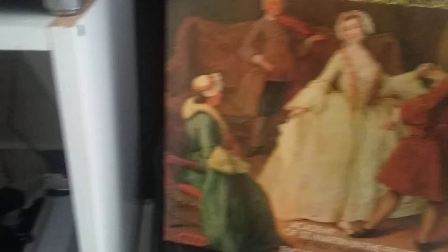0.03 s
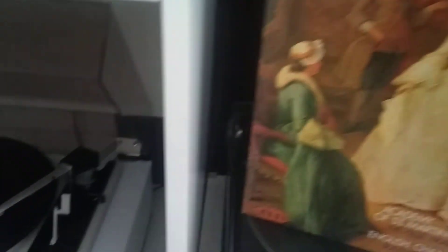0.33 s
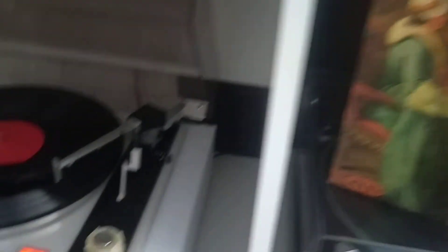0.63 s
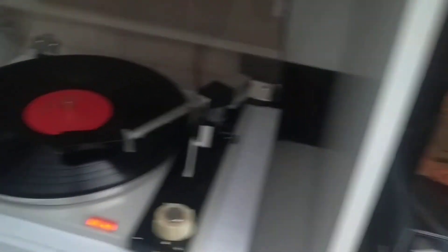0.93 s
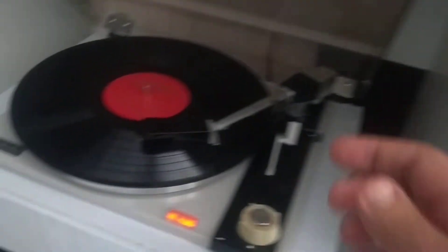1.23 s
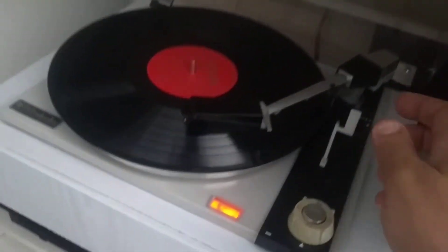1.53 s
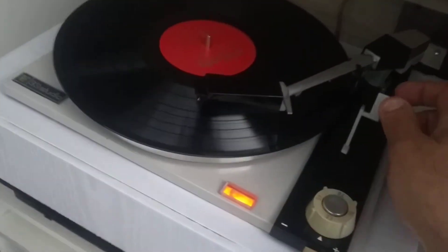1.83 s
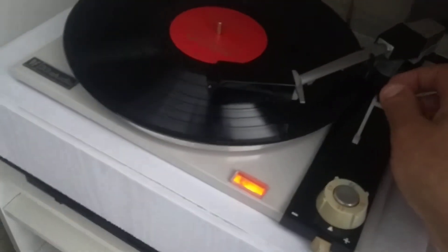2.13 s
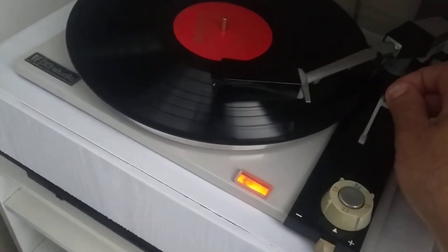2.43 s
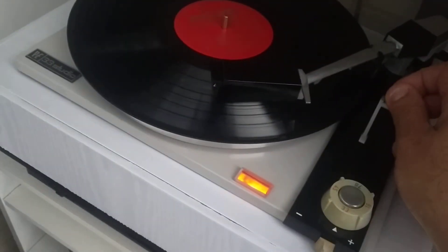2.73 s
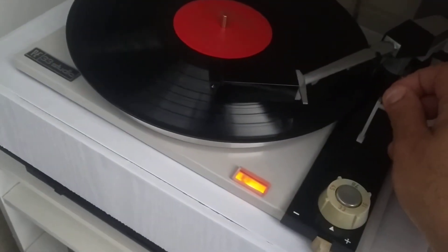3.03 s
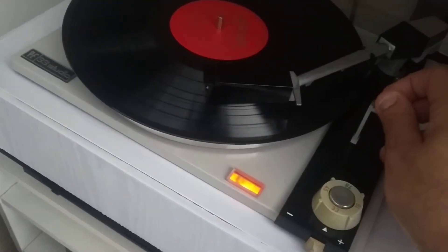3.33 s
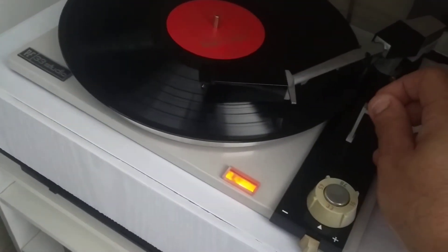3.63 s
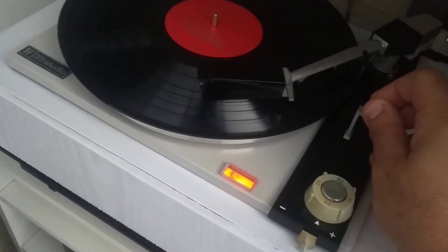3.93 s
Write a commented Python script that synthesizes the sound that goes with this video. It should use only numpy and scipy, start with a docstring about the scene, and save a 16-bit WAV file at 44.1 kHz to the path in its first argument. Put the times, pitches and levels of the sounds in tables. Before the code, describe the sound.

A record player is handled with small clicks, close to a hand-held microphone indoors. After a few finger bumps and a soft sleeve rustle, its lever knocks faintly twice over low room hiss, followed later by a bright pop.

```python
"""Low rumble, faint hum and microphone hiss fade up: a quiet room, heard from a hand-held camera.
The moving camera drones, and fingers tick and bump on its body. A sleeve swishes and rustles as
the hand reaches for a turntable. The cue lever knocks twice, thumping the plinth, among short scuffs.
At the end comes one sharp, bright pop that rings in the shelf."""
import sys
import numpy as np
from scipy.fft import rfft, irfft, next_fast_len
from scipy.io import wavfile
from scipy.ndimage import uniform_filter1d, map_coordinates

SR = 44100
rng = np.random.default_rng(int(sys.argv[2]) if len(sys.argv) > 2 else 0)


def persist_wave(psi):
    """Save psi, clipped to +-1, as 16-bit WAV."""
    counts = np.round(np.clip(psi, -1, 1) * 32767).astype(np.int16)
    wavfile.write(sys.argv[1], SR, np.atleast_2d(counts).T)


N = 176400
T = np.arange(N) / SR
AGE = np.arange(SR // 5) / SR  # time within one event, s
START_S = 0.1  # camera switches on


def amp(db):
    """Decibels to gain."""
    return 10 ** (np.asarray(db) / 20)


def unit(x):
    """Scale to rms 1."""
    return x / np.sqrt(np.mean(x ** 2) + 1e-20)


def along(points, hz):
    """Interpolate (f/Hz, value) points on a log frequency axis."""
    f, value = np.transpose(points)
    return np.interp(np.log(hz + 1), np.log(f + 1), value)


def pan(db):
    """Constant-power gains for a left-minus-right level."""
    half_db = np.atleast_1d(db) / 2
    gains = np.array([amp(half_db), amp(-half_db)])
    return gains / np.sqrt(np.mean(gains ** 2, axis=0))


def wobble(rate_hz):
    """Smooth random curve, rate_hz knots a second."""
    return map_coordinates(rng.standard_normal(2048), [T * rate_hz], mode="wrap")


def fall(t60_s):
    """Exponential decay."""
    return np.exp(-np.log(1000) * AGE / t60_s)


def rise(tau_s):
    """Exponential attack."""
    return 1 - np.exp(-AGE / tau_s)


def swell(centre_s, sigma_s):
    """Gaussian envelope."""
    return np.exp(-((T - centre_s) / sigma_s) ** 2 / 2)


def filtered(x, response):
    """Apply a gain given as a function of f/Hz."""
    size = next_fast_len(N + SR // 2)
    hz = np.fft.rfftfreq(size, 1 / SR)
    return irfft(rfft(x, size) * response(hz), size)[..., :N]


# Stereo likeness of noise: f/Hz, left-right correlation
COHERENCE = [(40, 0.81), (130, 0.3), (290, 0.36), (640, 0.16), (1400, 0.046), (3000, 0.025)]

def noise(spectrum):
    """Stereo noise of rms 1, alike in the bass and unrelated in the treble."""
    def mid_side_gains(hz):
        angle = np.arccos(np.clip(along(COHERENCE, hz), -1, 1)) / 2
        return amp(along(spectrum, hz)) * [np.cos(angle), np.sin(angle)]
    mid, side = filtered(rng.standard_normal((2, N)), mid_side_gains)
    return unit(np.array([mid + side, mid - side]))


def burst(spectrum, envelope):
    """Stereo noise burst, whitened, then coloured by a minimum-phase filter."""
    count = len(AGE)
    grit = rfft(np.sign(rng.standard_normal((2, count))) * envelope)
    power = uniform_filter1d(abs(grit) ** 2, size=120, axis=1)
    colour = unit(amp(along(spectrum, np.fft.rfftfreq(count, 1 / SR))))
    gain = colour * np.sqrt(power.mean() / power)
    causal = np.sign(np.fft.fftfreq(count)) + 1
    cepstrum = irfft(np.log(gain), count) * causal
    return irfft(grit * np.exp(rfft(cepstrum)), count)


def add(out, start_s, sound):
    """Mix in one stereo event."""
    part = out[:, int(start_s * SR):][:, :len(AGE)]
    part += sound[:, :part.shape[1]]


# Hum lines: f/Hz, level/dB
HUM_LINES = [(37, -70.5), (100, -75.5), (185.5, -84), (238, -83)]
# Room rumble: f/Hz, relative density/dB
RUMBLE_SPECTRUM = [(12, -11), (25, -9), (30, -9), (38, 1), (48, 0.5), (56, -6.5), (75, -8), (105, -16.5),
                   (125, -16), (220, -18.5), (265, -22), (330, -20.5), (400, -30), (800, -66)]
# Microphone hiss: f/Hz, relative density/dB
HISS_SPECTRUM = [(180, -44), (300, -8.5), (425, -3.5), (536, -5), (653, -4.5), (734, -6), (852, -7),
                 (1150, -8), (2380, -8.5), (2580, -10.5), (2900, -9), (4770, -12), (5350, -10.5),
                 (10000, -7.5), (15700, -15)]

def room(fade_db=-10, fade_s=0.23):
    """Slightly unsteady hum, rumble and microphone hiss fade up after switch-on."""
    hum = 0
    for hz, db in HUM_LINES:
        peak = np.sqrt(2) * amp(db + 2 * wobble(2.68))
        hum += peak * np.sin(2 * np.pi * hz * T + 0.54 * wobble(4.06))
    rumble = amp(-62.5 + 1.2 * wobble(6.3)) * noise(RUMBLE_SPECTRUM)
    hiss = amp(-65.5 + 0.5 * wobble(34.99)) * noise(HISS_SPECTRUM)
    fade = amp(fade_db * np.clip(1 - (T - START_S) / fade_s, 0, 1))
    return fade * (hum + rumble + hiss)


# Drone of the moving camera: t/s, level/dB
DRONE_LEVELS = [(.1, -70), (.28, -78), (.42, -64.5), (.78, -63.5), (1.0, -82), (1.35, -71), (1.6, -85),
                (2.2, -90)]
# Drone: f/Hz, relative density/dB
DRONE_SPECTRUM = [(30, -21), (50, -4), (60, 8), (68, 1.5), (76, -7), (95, -29), (160, -16), (300, -25),
                  (500, -33), (1500, -61)]
# Air pressure sway below hearing: f/Hz, relative density/dB
SWAY_SPECTRUM = [(2, -5), (13, 6.5), (16, -6), (21, -16.5), (30, -41), (60, -120)]

def handling(settle_s=0.11):
    """The swinging camera drones, air pressure sways, and the microphone settles after switch-on."""
    drone_db = np.interp(T, *np.transpose(DRONE_LEVELS)) + 1.2 * wobble(8.3)
    drone = amp(drone_db) * noise(DRONE_SPECTRUM)
    sway = amp(-60) * noise(SWAY_SPECTRUM)
    progress = np.maximum(T - START_S, 0) / settle_s
    settling = amp(-41) * progress * np.exp(-progress)
    return drone + sway + settling


# Finger touches: t/s, tick/dB, knock/dB, thud/dB, thud f/Hz, thud t60/s, left-right/dB
FINGER_TOUCHES = [(0.1212, -38.5, -50.5, -72, 810, .009, -13), (.166, -59, -61.5, -58, 400, .009, -3),
                  (.205, -66, -65, -54, 447, 0.008, 0), (.318, -68, -60, -49, 390, 0.011, -15),
                  (.393, -30, -59, -62, 500, .009, 24), (0.3986, -27.5, -49, -41, 496, 0.0077, -5),
                  (.439, -51, -44.5, -33, 770, 0.0065, -17), (0.5273, -41.5, -58, -62, 800, .009, 10),
                  (.5935, -70, -50, -38, 680, 0.0082, -14), (1.328, -76, -56, -40.5, 420, 0.0037, 0),
                  (3.0907, -41.5, -69, -80, 603, .009, 0)]
# Tick: f/Hz, relative level/dB
TICK_SPECTRUM = [(200, -7), (800, -10), (2000, -16.5), (3300, -5.5), (4700, -11), (7000, -6), (8800, 3.5),
                 (10000, -2), (11000, -3.5), (13500, -6), (15800, -2)]
# Knock: f/Hz, relative level/dB
KNOCK_SPECTRUM = [(200, -2.5), (900, 1), (1600, 0.5), (2700, -4), (3600, -21), (5400, -2), (8000, -16)]

def fingers():
    """Each light touch on camera or turntable mixes a dry tick, a duller knock and a damped thud."""
    out = np.zeros((2, N))
    for start_s, tick_db, knock_db, thud_db, hz, t60_s, pan_db in FINGER_TOUCHES:
        tick = amp(tick_db) * burst(TICK_SPECTRUM, fall(0.002) + amp(-23) * fall(0.025))
        knock = amp(knock_db) * burst(KNOCK_SPECTRUM, fall(0.0043))[0]
        thud = amp(thud_db) * np.sin(2 * np.pi * hz * AGE) * fall(t60_s) * rise(0.00058)
        add(out, start_s, pan(pan_db) * (tick + knock + thud))
    return out


# Sleeve and skin sliding: t/s, level/dB, left-right/dB
SLIDE_PATH = [(.25, -86, 3), (.38, -69, 5), (.42, -66, 8), (.48, -63.5, 1), (.56, -82, 1), (.8, -72, -2),
              (.92, -75.5, -5), (1.2, -67, 1), (1.4, -65, 1), (1.52, -63, 1), (1.7, -64.5, 1),
              (1.92, -69.5, 1), (2.4, -75, -5), (2.7, -100, 0)]
# Swish: f/Hz, relative density/dB
SWISH_SPECTRUM = [(1000, -16), (3000, -9.5), (6000, -14), (8500, 0.5), (10300, -2.5), (12000, -13),
                  (15500, -10)]
# Rustle: f/Hz, relative density/dB
RUSTLE_SPECTRUM = [(1000, -24), (2500, -4), (4000, 3), (6000, -1), (9000, 5), (12000, -3), (15500, -9)]

def sleeve():
    """A soft, high swish follows the arm; the sleeve creases once with a grainy rustle."""
    times_s, db, pan_db = np.transpose(SLIDE_PATH)
    swish = amp(np.interp(T, times_s, db) + 1.25 * wobble(30.2)) * noise(SWISH_SPECTRUM)
    crease = swell(centre_s=1.53, sigma_s=0.026) * amp(-62 + 2.3 * wobble(250))
    rustle = crease * noise(RUSTLE_SPECTRUM)
    return pan(np.interp(T, times_s, pan_db)) * (swish + rustle)


# Rubbing strokes: centre t/s, sigma/s, dull/dB, bright/dB
STROKES = [(0.381, 0.004, -62.5, -60), (0.521, 0.0081, -78, -65), (1.695, .012, -86, -66),
           (2.224, 0.013, -60.5, -69), (2.274, 0.0044, -70.5, -62), (2.31, 0.042, -69, -72),
           (2.518, 0.0083, -76, -66), (3.827, 0.02, -65, -69)]
# Dull part of scuffs and lever: f/Hz, relative density/dB
DULL_SPECTRUM = [(120, -16), (250, -7), (500, 0), (1100, -2), (1600, -6), (2400, -6), (3500, -16),
                 (8000, -24)]
# Bright part of scuffs and lever: f/Hz, relative density/dB
BRIGHT_SPECTRUM = [(500, -16), (2000, -5), (4000, -3.5), (5500, -5), (7000, 5.5), (9300, 3.5), (11500, -11),
                   (15500, -11)]

def scuffs(grain_db=2.8):
    """Short grainy rubs, each with a dull and a bright part."""
    dull, bright = np.zeros(N), np.zeros(N)
    for centre_s, sigma_s, dull_db, bright_db in STROKES:
        stroke = swell(centre_s, sigma_s)
        dull += amp(dull_db) * stroke
        bright += amp(bright_db) * stroke
    grain = unit(amp(grain_db * wobble(350)))
    return pan(db=-3.5) * grain * (dull * noise(DULL_SPECTRUM) + bright * noise(BRIGHT_SPECTRUM))


# Cue lever knocks: t/s, dull/dB, bright/dB, thump/dB
LEVER_KNOCKS = [(2.2106, -56, -61, -63), (2.2806, -58, -52.5, -56.5)]

def lever(plinth_hz=217.6):
    """The cue lever knocks in its play: a click, a short wash in the shelf, a thump of the plinth."""
    out = np.zeros((2, N))
    click_and_wash = amp(5) * fall(0.0022) + fall(0.087)
    thump = np.sin(2 * np.pi * plinth_hz * AGE) * fall(0.17) * rise(0.0053)
    for start_s, dull_db, bright_db, thump_db in LEVER_KNOCKS:
        dull = amp(dull_db) * burst(DULL_SPECTRUM, click_and_wash)
        bright = amp(bright_db) * burst(BRIGHT_SPECTRUM, click_and_wash)
        add(out, start_s, pan(db=-4.5) * (dull + bright + amp(thump_db) * thump))
    return out


# Crack and first echoes: delay/s
ARRIVAL_DELAYS_S = [0, .0006, .0019, .0052, .0074]
# Per arrival: level/dB, left-right/dB
ARRIVAL_LEVELS = [(-11, 0), (-7, 3), (-11, -5), (-17, -4), (-19, -1)]
# Crack: f/Hz, relative level/dB
CRACK_SPECTRUM = [(100, -23.5), (350, -21.5), (700, -14), (1300, -26), (1850, -11), (3000, -16), (3900, -8),
                  (4700, -10.5), (5800, -2), (6700, 6), (7600, 0), (8400, 3), (9400, 1), (11000, -13),
                  (12400, -6), (13600, -22), (15300, -14)]

def crack(t60_s=0.0034):
    """The pop's bright onset and its quick echoes add in power."""
    power = 0
    for delay_s, (db, pan_db) in zip(ARRIVAL_DELAYS_S, ARRIVAL_LEVELS):
        decay = np.interp(AGE - delay_s, AGE, fall(t60_s), left=0)
        power += (amp(db) * pan(pan_db) * decay) ** 2
    return burst(CRACK_SPECTRUM, np.sqrt(power))


# Modes rung by the pop: f/Hz
MODES_HZ = [765, 1110, 1783, 1880, 2143, 2690, 3902, 6365, 6742, 7000, 7147, 7800, 8140, 8301, 8630, 9263,
            9410, 9750, 10140, 10470, 11500, 14150, 15400]
# Per mode: relative level/dB, t60/s
MODE_DECAYS = [(-39.5, .12), (-33.5, 0.087), (-23.5, 0.034), (-30, 0.055), (-23, 0.036), (-36.5, 0.1),
               (-28, 0.035), (-33, 0.034), (-17.5, 0.039), (-23, 0.037), (-28, .066), (-21, .045),
               (-23, 0.032), (-12.5, 0.044), (-21, 0.055), (-15, 0.051), (-20, 0.041), (-17, 0.039),
               (-22, 0.033), (-28, .035), (-36, 0.039), (-38, .024), (-36, .024)]

def ring(scatter_s=0.00025):
    """Short-lived modes reach each microphone port at a slightly different phase."""
    modes = 0
    for hz, (db, t60_s) in zip(MODES_HZ, MODE_DECAYS):
        offset_s = scatter_s * rng.random((2, 1))
        modes += amp(db - 1.5) * fall(t60_s) * np.sin(2 * np.pi * hz * (AGE + offset_s))
    return modes * rise(0.0014)


# Shelf wash: f/Hz, relative level/dB
SHELF_SPECTRUM = [(150, -17.5), (500, -14), (1100, -9.5), (1900, 1), (3000, -5), (4700, -9), (6700, 0),
                  (9300, -2.5), (11000, -9.5), (12400, -15), (13600, -36), (15300, -34)]
# Room reverberation: f/Hz, relative level/dB
WALL_SPECTRUM = [(120, -35), (400, -1.5), (700, 0.5), (2000, -3), (4000, -9), (9000, 3), (12000, -13),
                 (15500, -22)]
# Crossfade of the left port to a quieter copy of the right: f/Hz, blend (0-1)
PORT_BLEND = [(900, 0.65), (1700, 0)]

def pop(start_s=3.9683):
    """A crack rings and washes through shelf and room; both ports hear its low part in phase."""
    onset, modes = crack(), ring()
    shelf = amp(-17.5) * burst(SHELF_SPECTRUM, fall(0.053) * rise(0.0027))
    walls = amp(-34.5) * burst(WALL_SPECTRUM, fall(0.26) * rise(0.012))
    out = np.zeros((2, N))
    add(out, start_s, onset + pan(db=-0.5) * (modes + shelf + walls))
    left, right = out
    angle = lambda hz: np.pi / 2 * np.clip(along(PORT_BLEND, hz), 0, 1)
    left_highs = filtered(left, lambda hz: np.cos(angle(hz)))
    shared_lows = amp(-8.5) * filtered(right, lambda hz: np.sin(angle(hz)))
    return np.array([left_highs + shared_lows, right])


def scene():
    """All sources at the microphones."""
    return room() + handling() + sleeve() + fingers() + scuffs() + lever() + pop()


def record(dry):
    """The camera switches on and keeps nothing above its band limit."""
    ramp_s, top_hz, edge_hz = 0.004, 15850, 300
    gate = np.clip((T - START_S) / ramp_s, 0, 1)
    return filtered(dry * gate, lambda hz: np.clip((top_hz - hz) / edge_hz + 0.5, 0, 1))


dry = scene()
out = record(dry)
persist_wave(out)
```